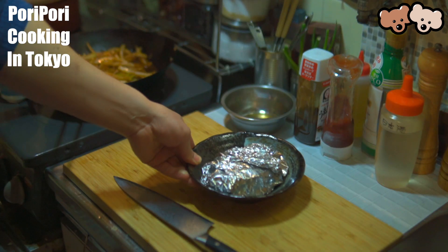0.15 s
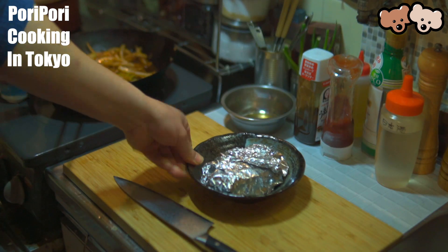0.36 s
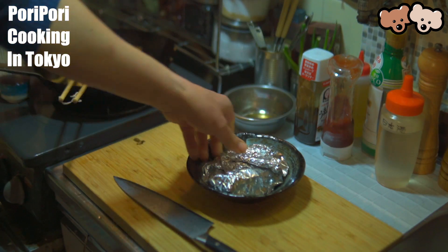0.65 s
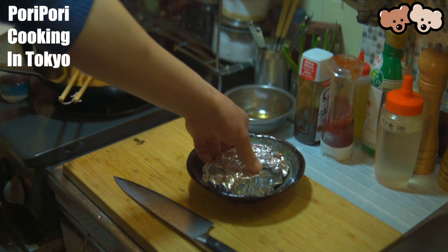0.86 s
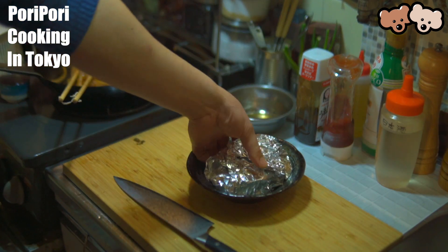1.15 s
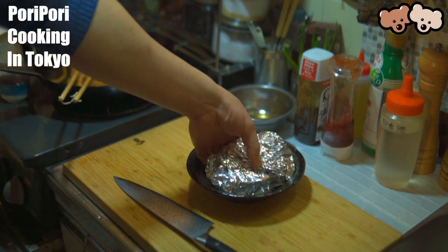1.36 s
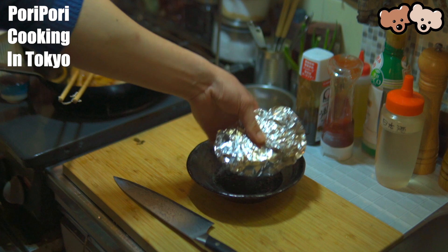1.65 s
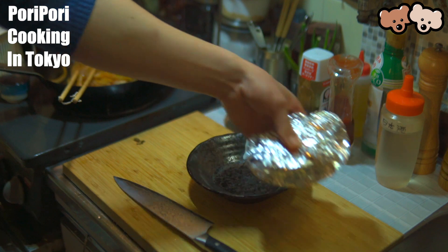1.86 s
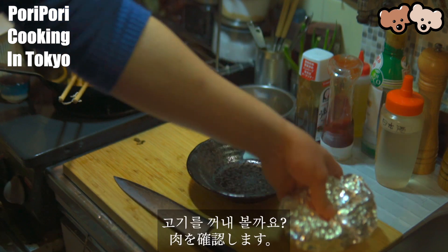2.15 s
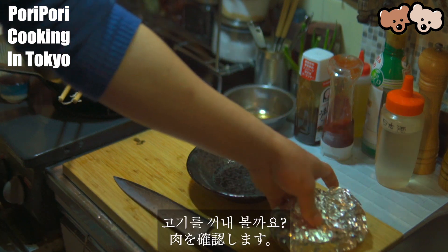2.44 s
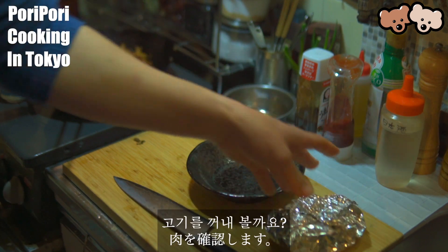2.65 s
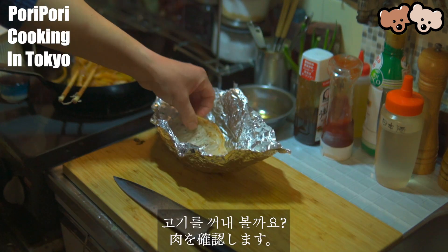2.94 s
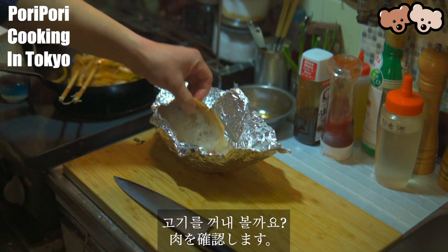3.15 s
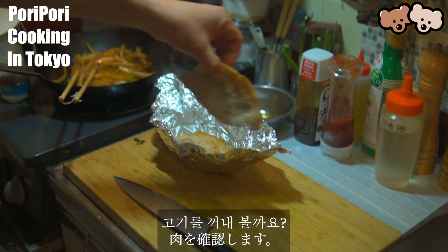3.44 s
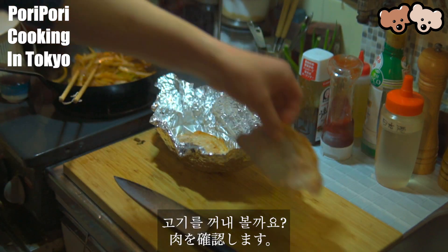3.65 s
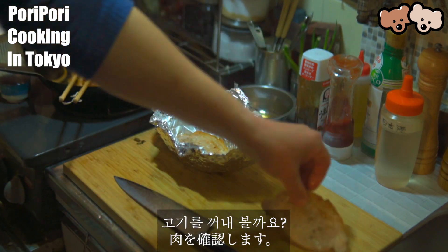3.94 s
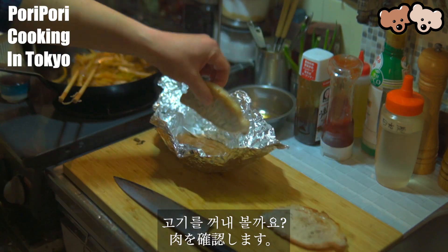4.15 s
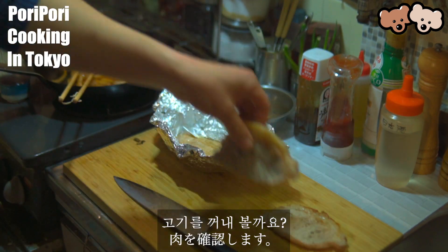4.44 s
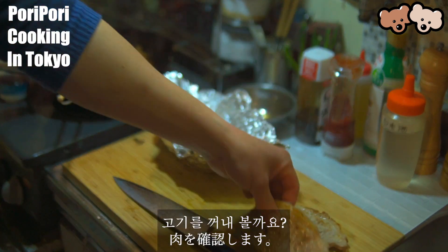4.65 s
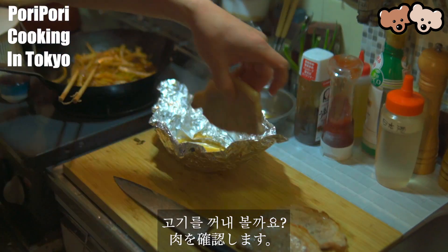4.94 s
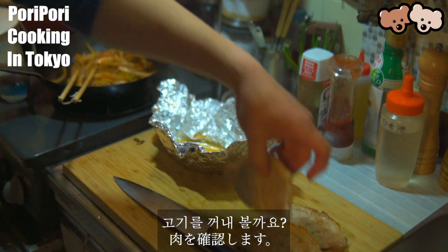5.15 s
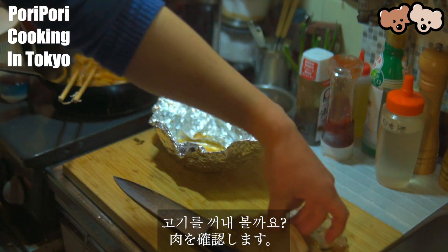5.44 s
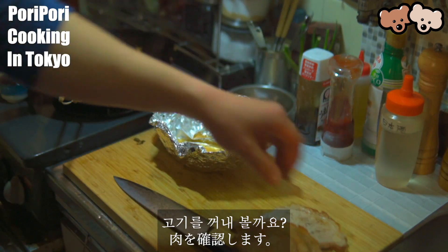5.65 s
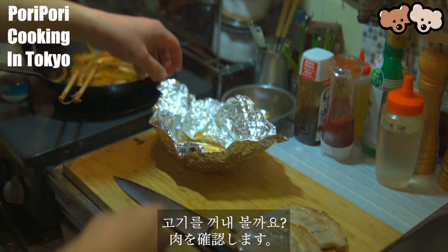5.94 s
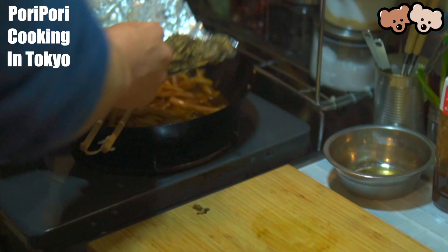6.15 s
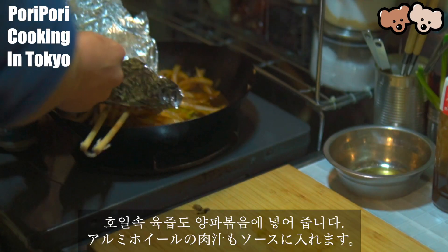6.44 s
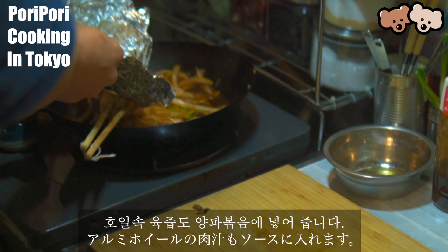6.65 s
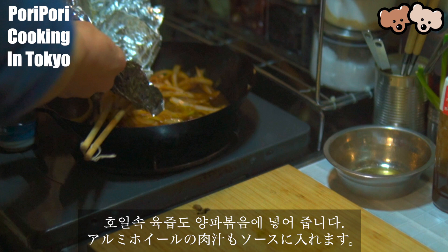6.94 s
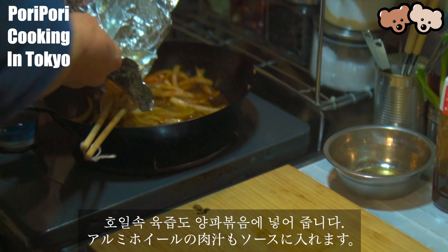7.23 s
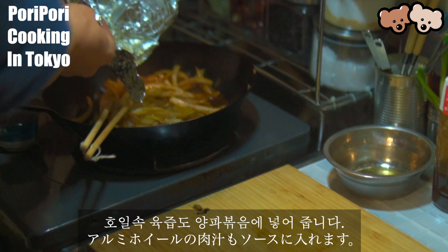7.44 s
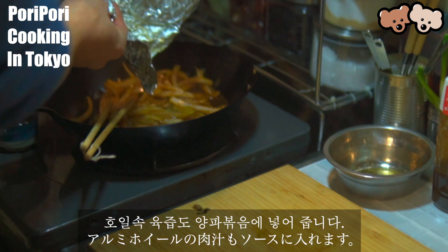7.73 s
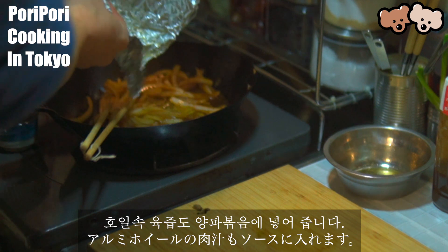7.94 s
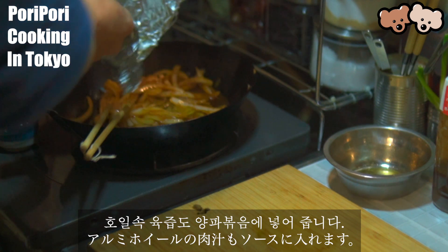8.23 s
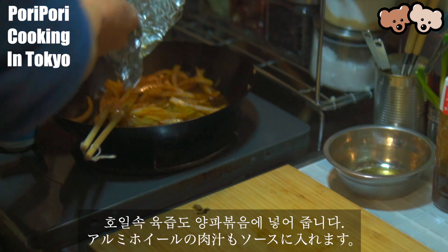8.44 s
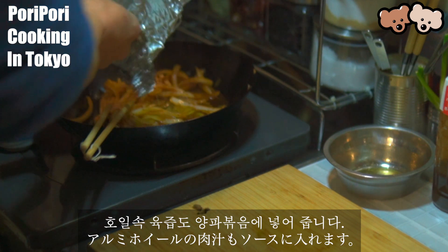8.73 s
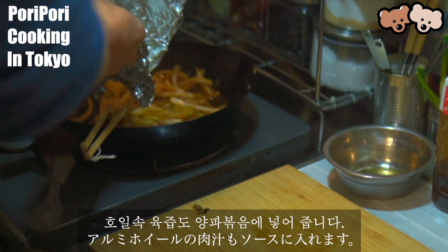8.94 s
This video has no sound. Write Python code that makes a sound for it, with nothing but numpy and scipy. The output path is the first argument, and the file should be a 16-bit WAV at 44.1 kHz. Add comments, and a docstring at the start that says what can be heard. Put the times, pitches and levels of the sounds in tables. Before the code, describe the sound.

A close microphone in a small kitchen hears a ceramic bowl knock loudly on a wooden board, then a faint rim rub and tick. Foil crinkles brightly as a parcel is lifted and unfolded. Soft wet smacks and drips follow as meat slices are pulled out, then a dull bump, and softer, slightly farther foil crackling as it is tipped and shaken. Low air noise and hum throughout.

```python
"""Aluminium foil is handled in a small kitchen: a parcel is opened, later tipped and shaken over a pan.
Its crinkling is showers of tiny buckling grains, plus larger creases as runs of ringing facets.
Wet meat slices drip and smack (swelling bubble notes with splashes); the parcel bumps down (filtered noise).
First a ceramic bowl knocks on a wooden board (noise blow, decaying modes) and a finger brushes its rim.
Behind it are steady air noise and a wavering appliance hum."""
import sys
import numpy as np
from scipy import signal
from scipy.fft import rfft, irfft
from scipy.io import wavfile

SR = 44100
rng = np.random.default_rng(int(sys.argv[2]) if len(sys.argv) > 2 else 0)


def dump(signal):
    """Clip the signal to [-1, 1] and save it as 16-bit WAV at the path in sys.argv[1]."""
    limited = np.clip(np.atleast_2d(signal).T, -1, 1)
    pcm = np.round(limited * 32767).astype(np.int16)
    wavfile.write(sys.argv[1], SR, pcm)


N = 400428
TIME = np.arange(N) / SR

STOVE_S = 6.15  # foil leaves the board for the stove, farther from the microphone


def foil(far_db=-1.5, shift_s=0.02, count=3):
    """Direct over the board, softer and more echoing over the stove; the moving sheet shifts its reflections."""
    sound = crinkling() + snaps()
    far = TIME > STOVE_S
    facing = (TIME // shift_s) % count
    out = np.zeros(N)
    for k in range(count):  # each facing gets its own diffuse tails
        part = sound * (facing == k)
        out += room(part * ~far, wet_db=-4.0)
        out += gain_of(far_db) * room(part * far, wet_db=0.0)
    return out


# fine creases: (frequency [Hz], density [dB per Hz])
CREASE_SPECTRUM = [(500, -29), (2000, -7.5), (3600, -4), (5500, -3.5), (7000, -4), (8800, 0.5),
                   (10400, -8.5), (13200, 0), (15000, -1.5), (16000, -14)]
# broad folds: (frequency [Hz], density [dB per Hz])
FOLD_SPECTRUM = [(150, -13), (600, -2), (1300, 1.5), (3000, -2.5), (5000, -11.5), (10000, 3)]
WET_CUTOFF_HZ = 9500  # juice damps the crinkling above this
# how quickly a crease runs its course: tight parcel, open sheet
FOLDED_RUN_S, OPEN_RUN_S = 0.0018, 0.0045


def crinkling(dry_flex_db=-12, wet_flex_db=3, ticks_per_s=150, level_db=-0.92):
    """Dry foil ticks in separate creases; wet foil fizzes softly and rustles in broad folds."""
    effort, wet = handling()
    fizz = crackle(per_s=3200, spread_db=3.0, low_hz=2047, high_hz=13740, cycles=4.5)
    folds = crackle(per_s=1200, spread_db=4.0, low_hz=563, high_hz=6400, cycles=3.7)
    fizz = evened(colour(fizz, CREASE_SPECTRUM))
    folds = evened(colour(folds, FOLD_SPECTRUM))

    ticks = np.zeros(N)
    for when, pitch, size in rng.random((int(ticks_per_s * N / SR), 3)):
        add(ticks, when * N / SR, gain_of(10 * size) * crease(2800 * 4 ** pitch, FOLDED_RUN_S))
    ticks = evened(colour(ticks, CREASE_SPECTRUM))

    tick_share = 0.4 * (1 - wet / 2)  # of power
    creases = np.sqrt(1 - tick_share) * fizz + np.sqrt(tick_share) * ticks
    flex_db = dry_flex_db + wet * (wet_flex_db - dry_flex_db)
    sheet = creases + folds * gain_of(flex_db)
    damped = signal.filtfilt(*signal.butter(1, WET_CUTOFF_HZ, fs=SR), sheet)
    return ((1 - wet) * sheet + wet * damped) * effort * gain_of(level_db)


# hand moves, each a stretch of light crinkling: (start [s], end [s], level [dB], wetness [0-1])
# prise parcel loose, lift from bowl, carry to board, unfold, reach in for first slice, lift it,
# peel off second slice, third slice, tip foil over pan, let it drain, shake it out
MOVES = [(0.773, 1.232, -59, 0.43), (1.274, 1.582, -62.5, 0.3), (1.63, 2.346, -76.5, 0),
         (2.344, 2.603, -61, 0.28), (2.722, 2.877, -65.5, 0.6), (2.887, 3.265, -74.5, 0.98),
         (4.436, 4.546, -69, 0.82), (4.848, 5.02, -79, 0.7), (6.181, 6.817, -70, 0.75),
         (6.871, 8.351, -77.5, 0.3), (8.504, 8.984, -67.5, 0.33)]
MOVE_RISE_S, RELEASE_T60_S = 0.01, 0.31  # dies away as the foil settles
# foil crumples where squeezed or jolted: (time [s], length [s], level [dB], wetness [0-1])
CRUMPLES = [(0.896, 0.043, -50.5, 0.05), (1.14, 0.069, -50.5, 0.39), (2.435, 0.026, -55.5, 0.1),
            (2.575, 0.042, -48, 0.45), (3.079, 0.065, -62, 0.84), (4.984, 0.019, -65.5, 0.96),
            (5.866, 0.026, -65, 0.6), (6.299, 0.13, -64.5, 0.87), (6.502, 0.02, -59, 0.5),
            (6.682, 0.01, -54.5, 1), (7.119, 0.01, -53.5, 0.56), (7.979, 0.036, -59, 0)]
CRUMPLE_RISE_S, CRUMPLE_T60_S = 0.013, 0.075


def handling():
    """How hard the foil is worked (gain) and how wet the worked part is (0-1), over time."""
    power, wet = np.zeros((2, N))
    uneven = fits()
    acts = []
    for start, end, db, wetness in MOVES:
        acts.append((uneven * swell(start, end, MOVE_RISE_S, RELEASE_T60_S), db, wetness))
    for s, length, db, wetness in CRUMPLES:
        acts.append((swell(s, s + length, CRUMPLE_RISE_S, CRUMPLE_T60_S), db, wetness))
    for shape, db, wetness in acts:
        part = (gain_of(db) * shape) ** 2
        power += part
        wet += wetness * part
    return np.sqrt(power), np.clip(wet / (power + 1e-20), 0, 1)


FITS_PER_S, FIT_T60_S, FIT_SHARE = 43, 0.051, 0.58  # FIT_SHARE: of crinkling power


def fits():
    """The foil resists, gives way and settles again: an uneven gain of rms 1."""
    jerks = rng.exponential(1, N) * (rng.random(N) < FITS_PER_S / SR)
    power = signal.oaconvolve(jerks, dying(TIME[:SR // 4], FIT_T60_S) ** 2)[:N]
    return np.sqrt(1 - FIT_SHARE + FIT_SHARE * abs(power) / power.mean())


# loudest creases snapping through: (time [s], level [dB], pitch [Hz])
SNAPS = [(0.7868, -52, 7080), (0.8217, -37.5, 4000), (0.8965, -36.5, 3850), (0.911, -36, 8050),
         (0.9903, -34, 5300), (1.0637, -43, 7000), (1.143, -38, 3020), (1.3585, -44, 8700),
         (1.371, -38, 4800), (1.3994, -44, 8500), (1.4458, -44, 8220), (1.4727, -38, 8400),
         (1.5466, -39.5, 5000), (1.5745, -46.5, 8650), (1.6975, -42.5, 5200), (1.9784, -44.5, 4460),
         (2.2304, -43, 13100), (2.3452, -34.5, 6500), (2.4655, -35.5, 5850), (2.6046, -33.5, 5480),
         (3.0803, -44, 7800), (4.3541, -48, 4720), (4.449, -57, 4400), (5.8113, -47, 2800),
         (6.258, -44, 4570), (6.306, -46, 4970), (6.3166, -47.5, 3900), (6.331, -42, 3550),
         (6.3854, -48, 5580), (6.5026, -46, 4800), (6.6877, -42.5, 3570), (6.8828, -42.5, 8570),
         (7.6075, -48.5, 5140), (7.6833, -46.5, 5300), (7.812, -45.5, 7130), (7.9657, -40.5, 8300),
         (8.0634, -44, 5700), (8.1572, -50, 7500), (8.238, -49, 5130), (8.3218, -48.5, 13000),
         (8.344, -46, 6440), (8.4685, -48.5, 7500), (8.534, -43, 3300), (8.6411, -44, 10600),
         (8.676, -40.5, 3640), (8.7673, -46.5, 3720), (8.865, -49.5, 4800), (8.9669, -47, 6000)]
# lesser chance creases, kept only during moves; STRAY_DB is above the move's level
STRAY_PER_S, STRAY_DB, STRAY_SCATTER_DB, STRAY_LOW_HZ, STRAY_HIGH_HZ = 26, 14, 7.5, 3140, 10400
STRAY_WET_DB = -9.5  # soaked foil snaps more softly


def snaps(open_db=3):
    """Large creases heard one by one, and lesser ones in each move, standing out more in the open sheet."""
    creases = list(SNAPS)
    for s, size, hz in scattered(STRAY_PER_S, STRAY_LOW_HZ, STRAY_HIGH_HZ):
        above_db = STRAY_DB + STRAY_SCATTER_DB * size + open_db * (s > STOVE_S)
        for start, end, db, wet in MOVES:
            if start < s < end:
                creases.append((s, db + above_db + STRAY_WET_DB * wet, hz))
    out = np.zeros(N)
    for s, db, hz in creases:
        run_s = OPEN_RUN_S if s > STOVE_S else FOLDED_RUN_S
        add(out, s, gain_of(db) * crease(hz, run_s))
    return colour(out, CREASE_SPECTRUM)


def crease(hz, run_s, facet_t60_s=0.0037, scatter=0.451, main_share=1.4, count=14):
    """A crease gives way: a quick run of facets flip and ring, scattered in pitch, with a noisy click."""
    t, out = TIME[:400], np.zeros(1400)
    delays_s = run_s * rng.exponential(1, count)
    detune = scatter * rng.standard_normal(count)
    fade = dying(t, facet_t60_s)
    add(out, 0, main_share * np.sin(2 * np.pi * hz * t) * fade)

    centre_hz = hz ** (2 / 3) * 7000 ** (1 / 3)  # drawn towards 7 kHz
    facets_hz = np.clip(centre_hz * np.exp(detune), 1800, 14500)
    for s, facet_hz in zip(delays_s, facets_hz):
        add(out, s, np.exp(-s / run_s / 2) * np.sin(2 * np.pi * facet_hz * t) * fade)

    click = rng.standard_normal(len(out)) * dying(TIME[:len(out)], 6 * run_s)
    return peaked(out + signal.lfilter(*signal.iirpeak(hz, 2.0, SR), click))


def scattered(per_s, low_hz, high_hz):
    """Chance events, one per equal time slot: rows of (time [s], size [-1 to 1], pitch [Hz])."""
    when, size, pitch = rng.random((int(N / SR * per_s), 3)).T
    times_s = (np.arange(len(when)) + when) / per_s
    return zip(times_s, 2 * size - 1, low_hz * (high_hz / low_hz) ** pitch)


# loudest drips and wet smacks: (time [s], level [dB], bubble pitch [Hz], swell time [s])
DRIPS = [(2.8828, -43.5, 2220, 0.00046), (3.228, -60, 2050, .001), (3.241, -49.5, 3400, 0.0013),
         (3.262, -62, 5660, .003), (3.365, -43.5, 2150, 0.00045), (3.369, -48, 2850, .002),
         (3.415, -49, 980, 0.00072), (3.5915, -55.5, 1860, 0.001), (3.761, -52.5, 1626, 0.0021),
         (3.792, -53.5, 1610, .002), (3.8343, -51.5, 2650, 0.0012), (3.8449, -40.5, 1590, 0.0012),
         (3.907, -43.5, 1220, 0.00077), (4.125, -59, 2310, .001), (4.232, -60.5, 3500, 0.00094),
         (4.327, -58, 2030, 0.0015), (4.3705, -44.5, 1690, 0.0017), (4.4322, -47, 1660, .0013),
         (4.4905, -49, 1480, 0.00091), (4.505, -49, 1590, 0.00065), (4.515, -56, 2760, .0008),
         (4.545, -56, 5000, 0.00082), (4.95, -50, 1240, 0.00086), (5.4916, -47, 1250, .0007),
         (6.0335, -54.5, 1550, 0.00086), (6.614, -49, 1890, 0.0018)]
# juice squeezed between the slices: (time [s], level [dB])
JUICE = [(2.7, -91), (2.85, -74), (4.1, -79), (4.5, -73), (4.8, -92)]


def drips(rise=0.039, splash_db=-11):
    """Each wet contact opens a small cavity: its note swells, rises a little and dies, with a fine splash."""
    t, out = TIME[:2048], np.zeros(N)
    for s, db, hz, swell_s in DRIPS:
        age = t / swell_s
        turns = np.cumsum(hz * (1 + rise * np.tanh(age / 2 - 1))) / SR
        bubble = peaked(np.sin(2 * np.pi * turns) * age ** 2 * np.exp(-age))
        spray_spectrum = [(hz / 4, -15), (hz, 0), (hz * 2, -5), (hz * 8, -30)]
        spray = blow(spray_spectrum, chatter=0.8, t60_s=0.035)
        add(out, s, gain_of(db) * bubble)
        add(out, s + swell_s, gain_of(db + splash_db) * spray)
    # many smaller bubbles burst in the juice
    fizz = crackle(per_s=60, spread_db=6, low_hz=1500, high_hz=5000, cycles=3.4)
    out += evened(fizz) * curve(JUICE)
    return room(out, wet_db=-4.0)


# parcel bumps on bowl or pan: (time [s], level [dB])
BUMPS = [(2.606, -44), (2.797, -42.5), (3.124, -41), (5.8572, -30.5), (6.258, -39.5), (6.688, -37.5)]
# colour of a bump: (frequency [Hz], density [dB per Hz])
BUMP_SPECTRUM = [(150, -5.5), (500, 2.5), (1200, 1.5), (2200, -8), (6000, -12), (14000, -33)]


def bumps():
    """The soft parcel bumps down with a dull pat."""
    out = np.zeros(N)
    for s, db in BUMPS:
        add(out, s, gain_of(db) * blow(BUMP_SPECTRUM, chatter=0.098, t60_s=0.052))
    return room(out, wet_db=-3.5)


KNOCK_S = 0.1183  # bowl lands on the board
# colour of the blow: (frequency [Hz], density [dB per Hz])
BLOW_SPECTRUM = [(60, -29), (170, -16.5), (400, -2.5), (650, -10.5), (1000, -4), (1400, 2), (2300, -11),
                 (3400, -18), (4500, -25.5), (8000, -34), (16000, -47.5)]
# bowl and board ringing together: (frequency [Hz], relative level [dB], t60 [s])
BOARD_MODES = [(321, -31, 0.12), (461, -24, 0.14), (568.6, -29, .1), (733, -33, 0.11), (892, -20.5, 0.11),
               (952, -24.5, 0.15), (1145, -37, 0.071), (1260, -29, 0.071), (1368, -25, 0.11),
               (1450, -28, 0.12), (1570, -38, 0.077), (1680, -29, 0.15), (1800, -21, 0.083),
               (2070, -22.5, 0.074), (2265, -33, 0.088), (2695, -33, 0.12), (3480, -39, 0.089)]
# worktop thud under the board: (frequency [Hz], relative level [dB], t60 [s])
THUD_MODES = [(62, -44, 0.53), (120.6, -43.5, 0.48)]


def knock(contact_db=-9.0, ring_db=-3.0):
    """The bowl's foot strikes the board, and both ring."""
    contact, body = np.zeros((2, N))
    add(contact, KNOCK_S, gain_of(contact_db) * blow(BLOW_SPECTRUM, chatter=0.054, t60_s=0.037))
    add(body, KNOCK_S, gain_of(ring_db) * ring(BOARD_MODES + THUD_MODES))
    return room(contact, wet_db=-2.5) + body


# bowl rim: (frequency [Hz], relative level [dB], t60 [s])
RIM_MODES = [(2920, 0, 0.28), (4360, -1.5, 0.25), (6070, -2, 0.23), (8000, -3, 0.17), (10100, -14, 0.22),
             (12480, -13, .2)]
# fingers sliding off the rim: (time [s], level [dB])
SLIDE = [(.24, -77.5), (.35, -76.5), (.43, -80), (.47, -92)]
NAIL_S, NAIL_DB = 0.6165, -49  # fingernail ticks the rim


def rim(scuff_db=-17, split=0.0025):
    """Skin rubs the glazed rim into a faint rough ring; then a nail ticks it."""
    # the bowl is not quite round: each mode has a close twin that beats with it
    twins = [(hz * (1 + split), db, t60_s) for hz, db, t60_s in RIM_MODES]
    note = peaked(ring(RIM_MODES) + 0.5 * ring(twins))
    t = TIME[:len(note)]
    friction = rng.standard_normal(N)
    rubbed = evened(signal.oaconvolve(friction, note * dying(t, 0.028))[:N])
    out = (rubbed + 0.5 * colour(friction, CREASE_SPECTRUM)) * curve(SLIDE)
    scuff = gain_of(scuff_db) * rng.standard_normal(len(t)) * dying(t, 0.09)
    add(out, NAIL_S, gain_of(NAIL_DB) * (note + scuff))
    return room(out, wet_db=-6)


# steady air noise: (frequency [Hz], relative level [dB])
AIR_SPECTRUM = [(15, -3), (35, -10), (55, -0.5), (75, -7.5), (112, -2.5), (148, -17.5), (195, -5),
                (250, -13), (300, -11), (420, -18), (1000, -21), (2200, -31), (5000, -44.5), (9000, -48),
                (15000, -58)]
AIR_DB = -56
# appliance hum: (frequency [Hz], level [dB rms before flutter])
HUM = [(53.8, -62), (193.8, -74)]


def kitchen(swell_db=2.0, waver_turns=0.11, flutter_db=1.5):
    """Steady air noise whose deep rumble swells a little, and a wavering low hum."""
    spectrum = rfft(rng.standard_normal(N)) * gain_of(read(AIR_SPECTRUM, np.fft.rfftfreq(N, 1 / SR)))
    air = evened(irfft(spectrum, N))
    rumble = signal.filtfilt(*signal.butter(2, 120, fs=SR), air)
    hum = np.zeros(N)
    for hz, db in HUM:
        level = gain_of(db + flutter_db * wander(14.0)) * np.sqrt(2)
        hum += level * np.cos(2 * np.pi * (hz * TIME + waver_turns * wander(5.1)))
    return gain_of(AIR_DB) * (air - rumble + rumble * gain_of(swell_db * wander(2.3))) + hum


# room decay: (frequency [Hz], t60 [s])
ROOM_T60 = [(150, 0.31), (1000, 0.19), (4000, 0.16), (15000, 0.1)]
# first reflections off worktop and wall: (delay [s], gain)
ECHOES = [(.0019, 0.12), (.0031, 0.5), (.0068, 0.3)]


def room(x, wet_db):
    """Direct sound, near reflections and a short diffuse tail."""
    hz, t, z = signal.stft(rng.standard_normal(SR // 2), SR, nperseg=256)
    tail = signal.istft(z * dying(t, read(ROOM_T60, hz)[:, None]), SR, nperseg=256)[1]
    tail *= np.clip(TIME[:len(tail)] / 0.0015, 0, 1) ** 2
    answer = gain_of(wet_db) * tail / np.linalg.norm(tail)
    for s, gain in [(0.0011, 0.94)] + ECHOES:  # direct sound first
        add(answer, s, np.array([gain]))
    return signal.oaconvolve(x, answer)[:N]


def blow(points, chatter, t60_s):
    """A sharp contact followed by brief chatter of the touching surfaces."""
    t = TIME[:4096]
    force = chatter * rng.standard_normal(len(t)) * dying(t, t60_s)
    force[0] = 1
    return peaked(colour(force, points))


def ring(modes):
    """A struck body's answer: decaying modes of alternating sign."""
    t = TIME[:SR // 2]
    out = np.zeros(len(t))
    for k, (hz, db, t60_s) in enumerate(modes):
        out += (-1) ** k * gain_of(db) * dying(t, t60_s) * np.sin(2 * np.pi * hz * t)
    return out


def crackle(per_s, spread_db, low_hz, high_hz, cycles):
    """Many tiny grains, each a short decaying tone with its own moment, pitch and size."""
    when, size, pitch, phase = rng.random((int(per_s * N / SR), 4)).T[:, :, None]
    hz = np.minimum(low_hz * (high_hz / low_hz) ** pitch, SR / 2)
    step = np.arange(160)
    turns = hz * step / SR
    height = gain_of(spread_db * np.minimum(-np.log(1 - size), 3.5)) * hz
    grains = height * np.sign(phase - 0.5) * np.sin(2 * np.pi * turns) * np.exp(-turns / cycles)
    index = (when * N).astype(int) + step
    return np.bincount(index.ravel(), grains.ravel(), N)[:N]


def colour(x, points, size=2048):
    """Causal filter of unit energy with the given spectrum."""
    log_gain = np.log(gain_of(read(points, abs(np.fft.fftfreq(size, 1 / SR)))))
    taps = np.fft.ifft(np.exp(np.conj(signal.hilbert(log_gain)))).real  # minimum phase
    return signal.oaconvolve(x, taps / np.linalg.norm(taps))[:len(x)]


def wander(per_s):
    """Slow random drift of rms 1."""
    hz = np.fft.rfftfreq(N, 1 / SR)
    lowpass = np.exp(-np.minimum(hz / per_s, 10) ** 2)
    return evened(irfft(rfft(rng.standard_normal(N)) * lowpass, N))


def swell(start, end, rise_s, t60_s):
    """Attack, hold until the end, release."""
    return np.clip((TIME - start) / rise_s, 0, 1) * dying(np.clip(TIME - end, 0, 1), t60_s)


def curve(points):
    """Joins (time [s], level [dB]) rows, silent outside them, as a gain."""
    s, db = np.transpose(points)
    return gain_of(np.interp(TIME, s, db, -np.inf, -np.inf))


def dying(t, t60_s):
    """Exponential decay, 60 dB down at t60_s."""
    return np.exp(-np.log(1000) * t / t60_s)


def read(points, hz):
    """Reads a spectrum on a log-frequency axis."""
    f, value = np.transpose(points)
    return np.interp(np.log(hz + 1), np.log(f + 1), value)


def add(mix, s, sound):
    """Mixes a sound in at a given time."""
    part = mix[round(s * SR):][:len(sound)]
    part += sound[:len(part)]


def gain_of(db):
    """Decibels to amplitude."""
    return 10 ** (np.asarray(db) / 20)


def evened(x):
    """Scales to rms 1."""
    return x / np.sqrt(np.mean(x ** 2) + 1e-20)


def peaked(x):
    """Scales to peak 1."""
    return x / abs(x).max()


def scene():
    """Everything at the worktop, heard by one microphone."""
    return (foil() + drips() + bumps() + knock() + rim() + kitchen())[None]


EDGE_HZ = 15850


def record(dry):
    """Band limit: a steep lowpass at EDGE_HZ."""
    taps = signal.firwin(511, EDGE_HZ, window=("kaiser", 9), fs=SR)
    return signal.oaconvolve(dry, taps[None], "same")


dry = scene()
out = record(dry)
dump(out)
```